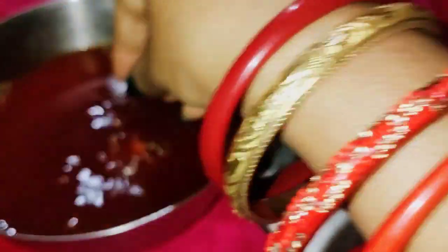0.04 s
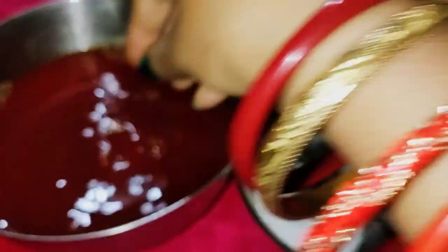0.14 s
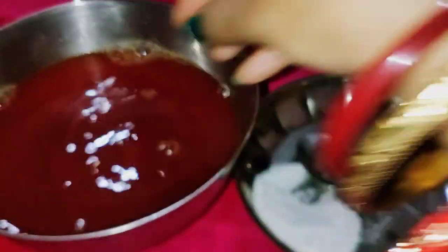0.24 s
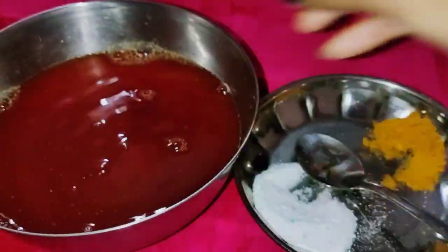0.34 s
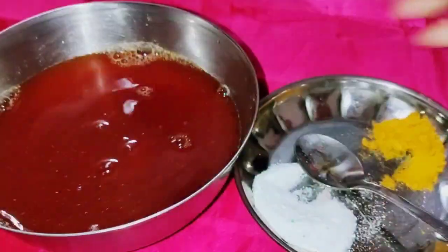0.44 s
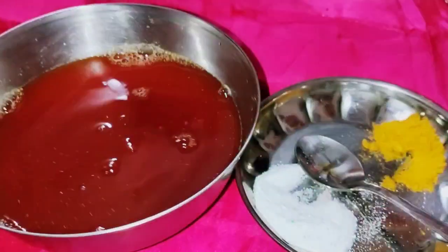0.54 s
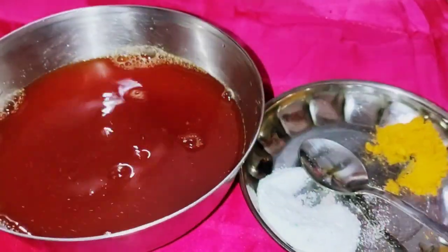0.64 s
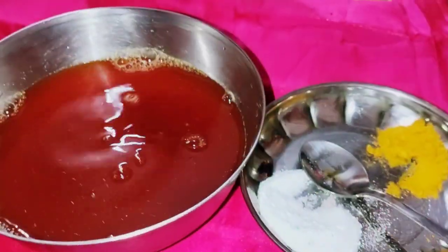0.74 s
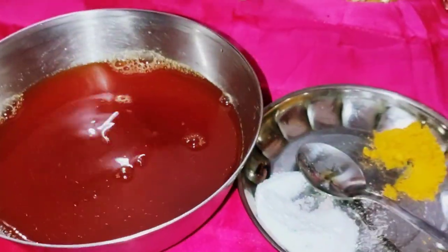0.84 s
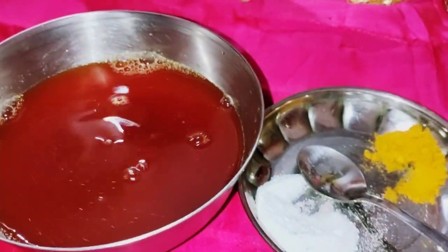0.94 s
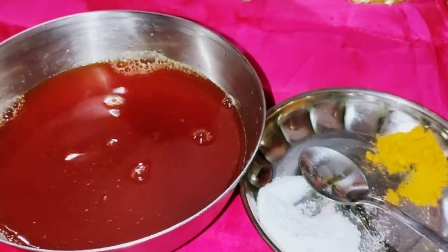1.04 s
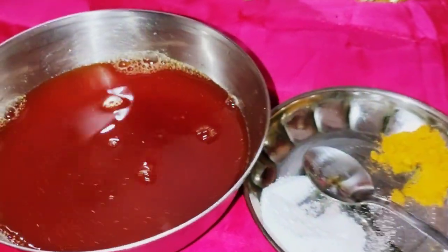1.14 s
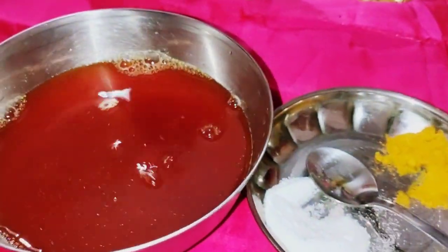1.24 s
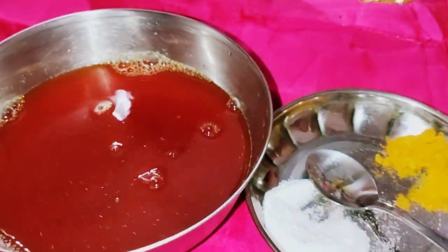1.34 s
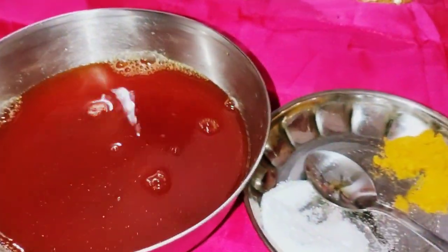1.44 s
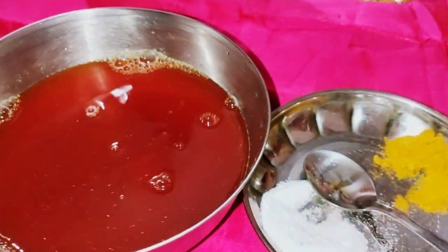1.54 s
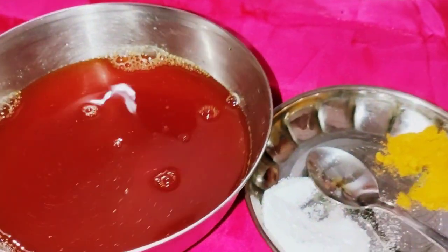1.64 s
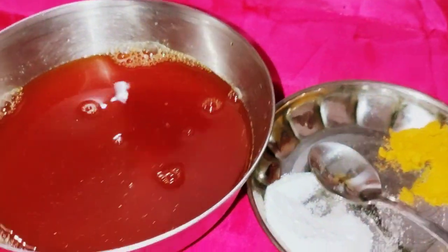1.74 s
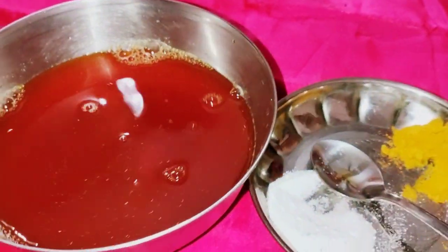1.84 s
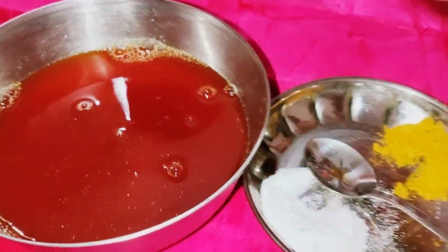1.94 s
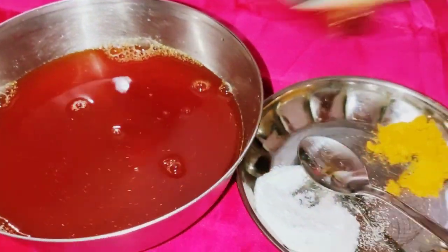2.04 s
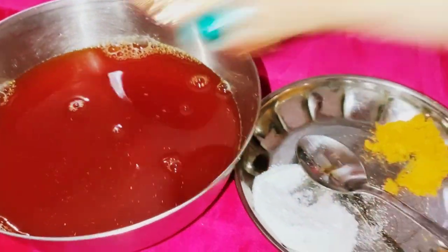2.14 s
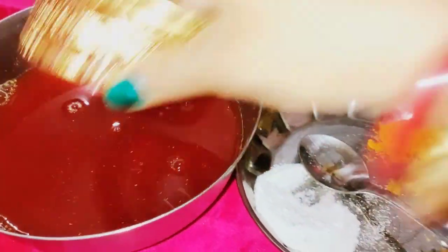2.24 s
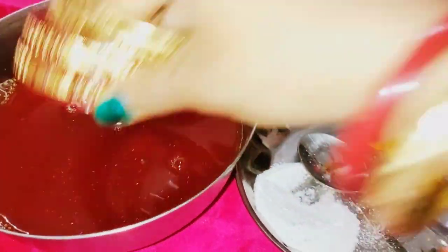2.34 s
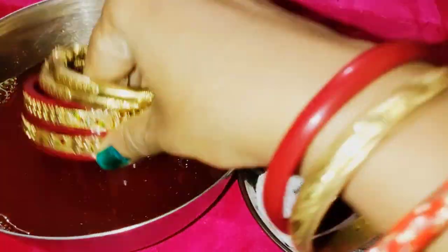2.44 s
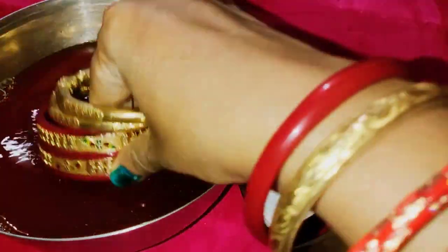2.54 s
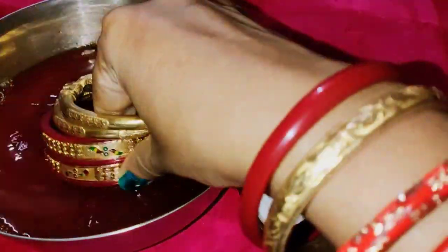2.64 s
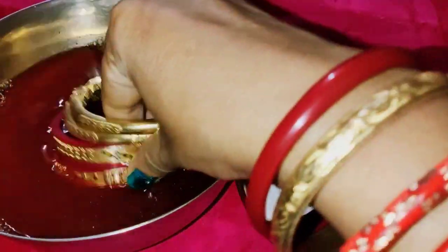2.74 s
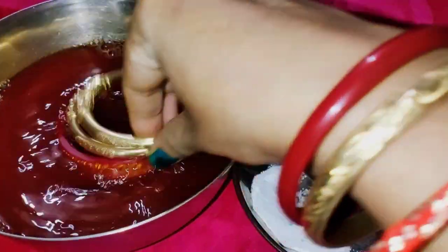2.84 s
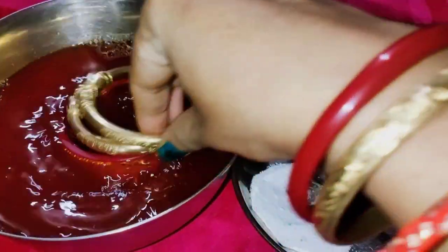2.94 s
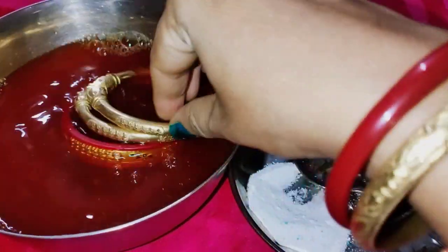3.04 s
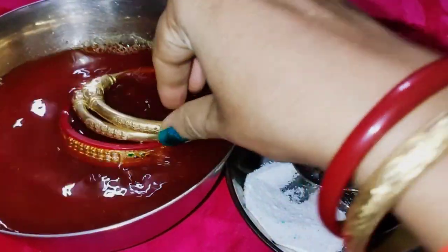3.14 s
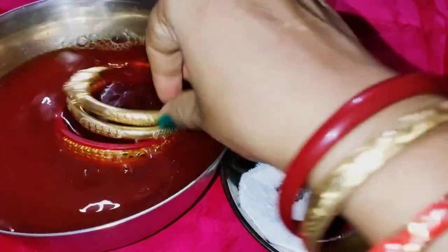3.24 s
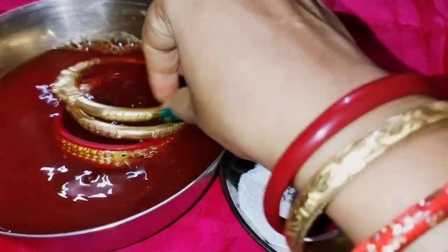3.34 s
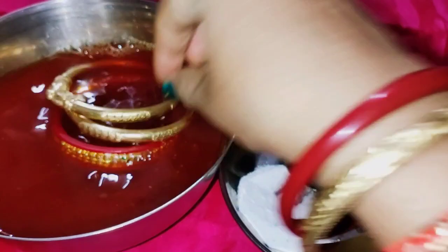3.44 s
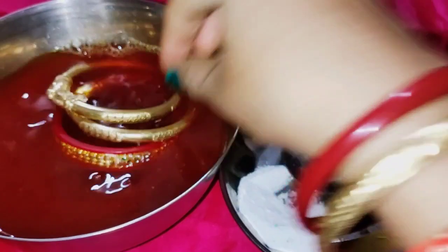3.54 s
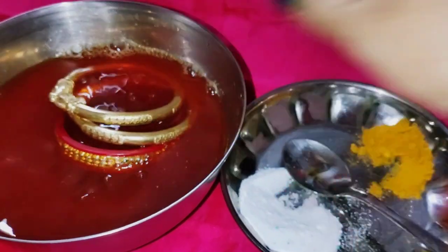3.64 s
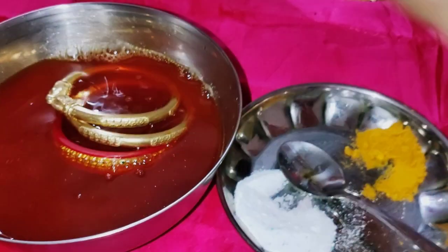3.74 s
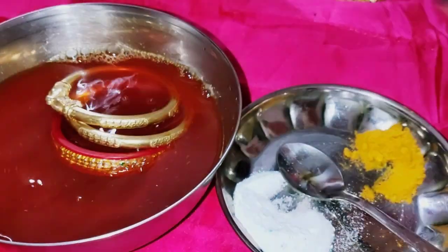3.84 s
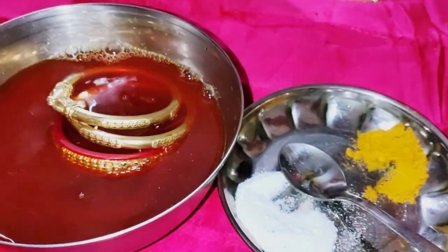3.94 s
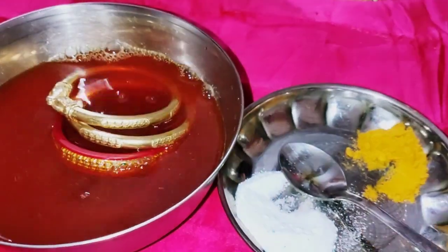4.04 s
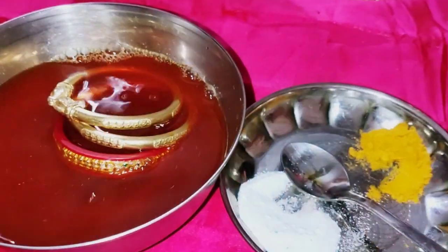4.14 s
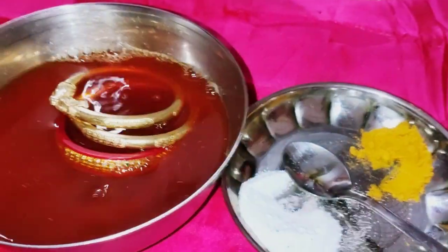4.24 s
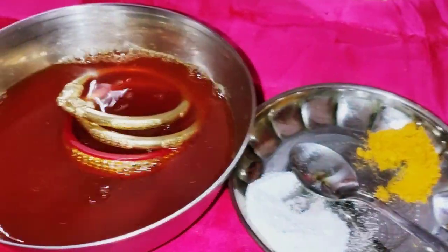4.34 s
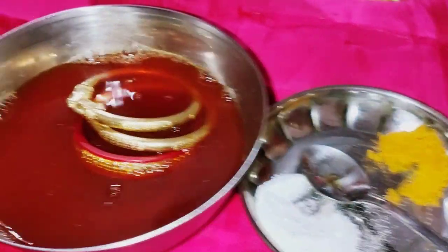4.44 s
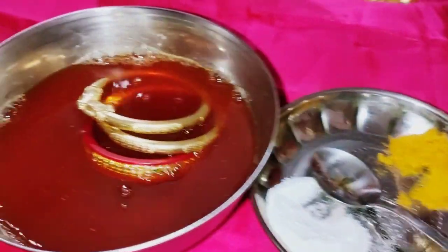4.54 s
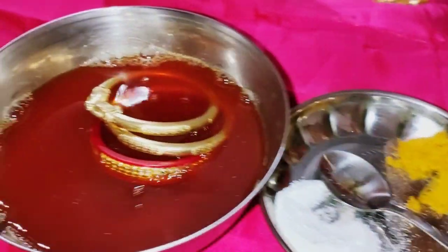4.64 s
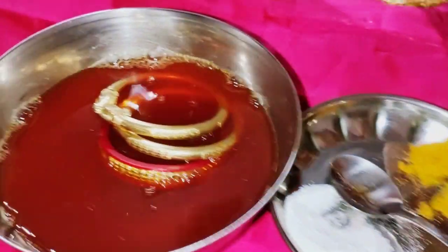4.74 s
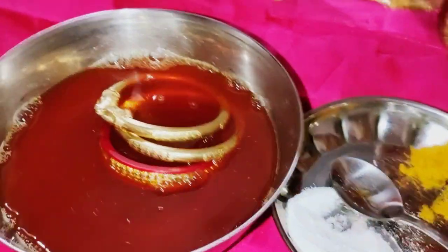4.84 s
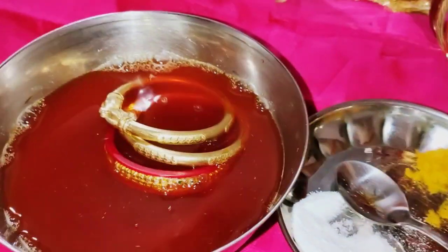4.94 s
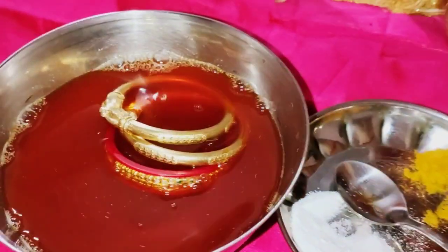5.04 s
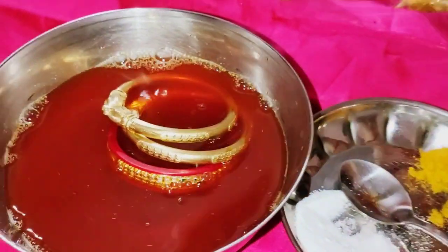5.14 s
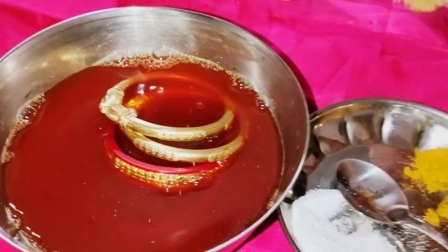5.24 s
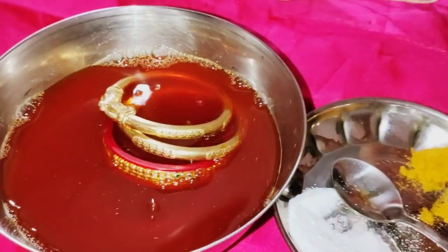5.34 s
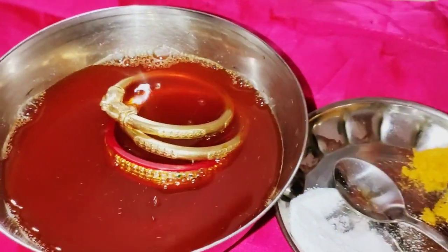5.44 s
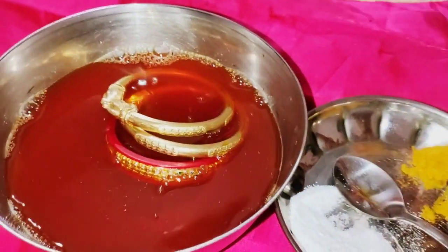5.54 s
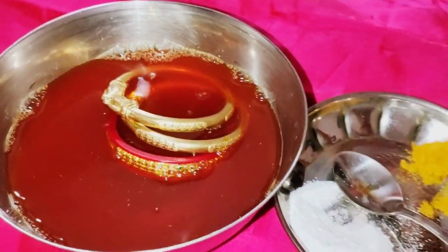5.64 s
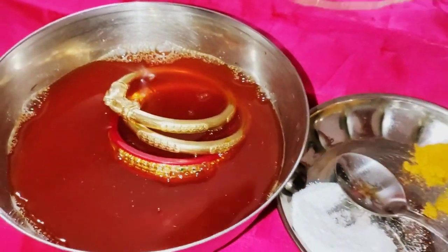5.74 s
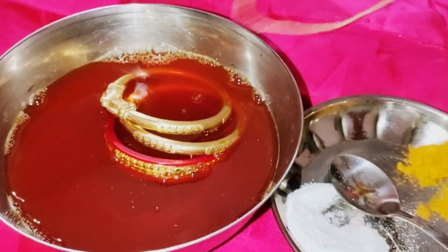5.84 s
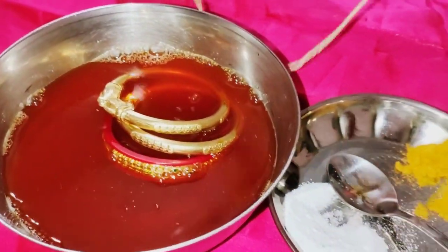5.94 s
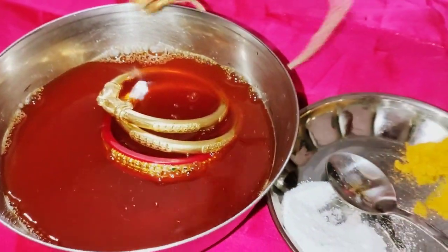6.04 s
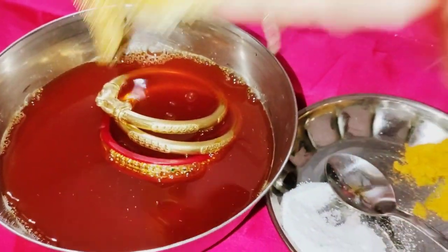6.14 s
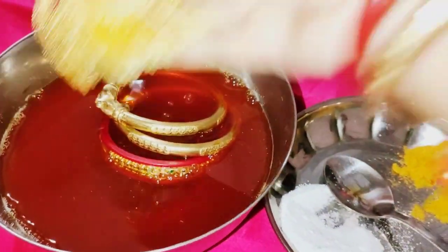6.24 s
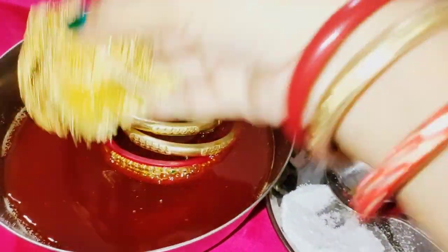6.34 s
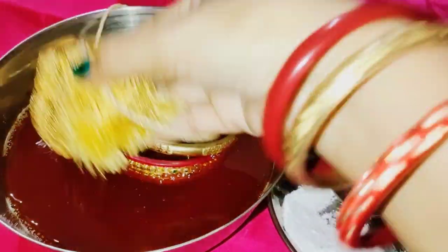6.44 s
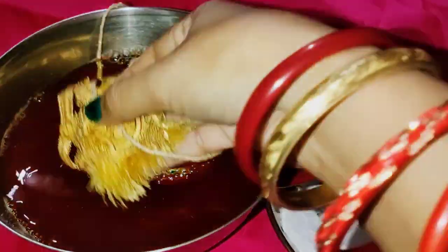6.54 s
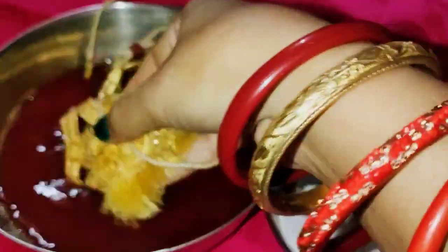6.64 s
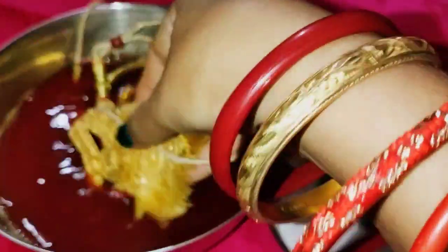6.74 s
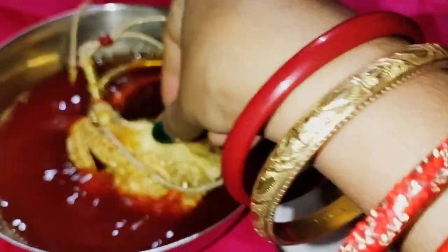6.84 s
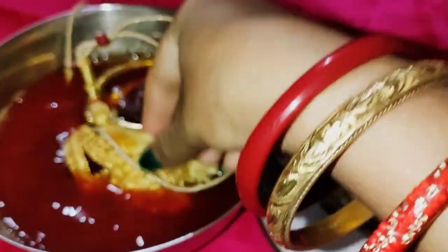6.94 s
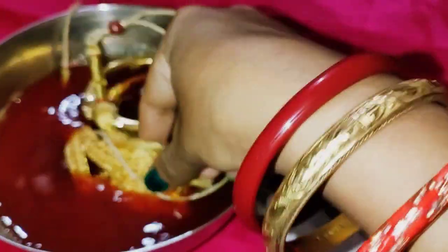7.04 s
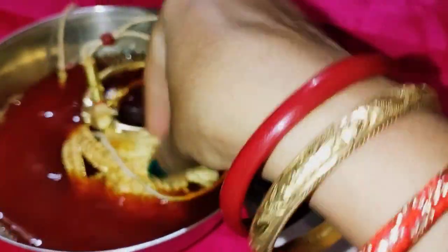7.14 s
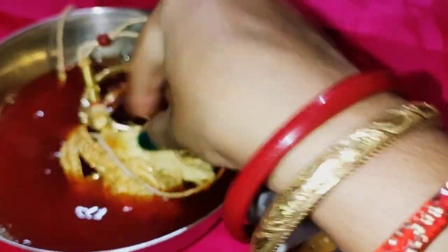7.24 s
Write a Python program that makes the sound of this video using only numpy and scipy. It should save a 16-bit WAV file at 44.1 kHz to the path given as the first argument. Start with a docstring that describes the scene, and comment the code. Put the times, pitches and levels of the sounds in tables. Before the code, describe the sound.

Gold bangles and a necklace clink, chatter and ring against a steel bowl of water in three bursts, over a faint rattling fan.

```python
"""Gold jewellery in a bowl of water

Gold bangles and a necklace are lowered into a steel bowl of water, close to a phone. They clink (cracks, gold modes,
damped bowl knocks), slide and chatter (dense ticks); one bangle bounces on the bowl and sings between contacts
(a tone restarted at each landing), and the glass bangles on the wrist ping (a few decaying modes).
Far off a loose ceiling fan rattles in rhythm (noise bursts) over the kitchen's hum (shaped noise); once something thumps."""
import sys
import numpy as np
from scipy import signal
from scipy.fft import rfft, irfft, next_fast_len
from scipy.io import wavfile
from scipy.ndimage import uniform_filter1d

SR = 44100
rng = np.random.default_rng(int(sys.argv[2]) if len(sys.argv) > 2 else 0)


def generate_wav(sig):
    """Save sig (samples, or channels by samples) to the path in sys.argv[1] as 16-bit PCM at SR."""
    pcm = np.round(np.clip(np.atleast_2d(sig).T, -1, 1) * 32767).astype(np.int16)
    wavfile.write(sys.argv[1], SR, pcm)


N = 321930
TIME = np.arange(N) / SR

# Modes of the gold stack: pitch_hz, level_db
GOLD_MODES = [(2550, -7.5), (5180, -2), (5870, 4.5), (6230, 2), (6580, 4), (7440, 6), (7990, -7.5),
              (8240, 0), (8900, -25.5), (9800, -17.5), (10200, 0.5), (10500, -4), (10890, -6),
              (12000, -6.5), (12880, -24), (14400, -18), (15250, 1)]
# Treble colour of metal contacts: pitch_hz, gain_db
CONTACT_TREBLE = [(2240, -62.5), (3800, -22.5), (4950, 1.5), (6690, -13), (8290, -4.5), (9040, -2.5),
                  (10000, -3), (11300, -4), (15500, -9.5), (16000, -25), (16500, -52.5)]


def amp(db):
    """Decibels to gain."""
    return 10 ** (np.asarray(db) / 20)


def unit(x):
    """Scale to rms 1."""
    return x / np.sqrt(np.mean(x ** 2) + 1e-20)


def peaked(x, db):
    """Scale so that the peak is at db."""
    return amp(db) * x / np.abs(x).max()


def along(points, hz):
    """Interpolate (Hz, value) points on a log frequency axis."""
    point_hz, values = np.transpose(points)
    return np.interp(np.log(hz + 1), np.log(point_hz + 1), values)


def filtered(x, response):
    """Multiply the spectrum of x by a complex response of frequency."""
    size = next_fast_len(len(x) + 4096)
    spectrum = rfft(x, size) * response(np.fft.rfftfreq(size, 1 / SR))
    return irfft(spectrum, size)[:len(x)]


def coloured(x, spectrum):
    """Shape x by (Hz, dB) points."""
    return filtered(x, lambda hz: amp(along(spectrum, hz)))


def resonant(x, modes):
    """Pass x through parallel (Hz, width Hz, dB) resonances of alternating sign."""
    def response(hz):
        total = 0
        for k, (centre, width, db) in enumerate(modes):
            damping = 1j * hz * width
            total = total + (-1) ** k * amp(db) * damping / (centre * centre - hz * hz + damping)
        return total
    return filtered(x, response)


def patchy(x, depth_db):
    """Give x a random gain that differs from band to band and moment to moment."""
    bins = signal.stft(x, nperseg=512)[2]
    field = uniform_filter1d(rng.standard_normal(bins.shape), size=3, axis=0)
    field = uniform_filter1d(field, size=12, axis=1)
    return signal.istft(bins * amp(depth_db * unit(field)), nperseg=512)[1][:len(x)]


def add(track, s, sound):
    """Mix a sound into the track at s seconds."""
    part = track[round(s * SR):][:len(sound)]
    part += sound[:len(part)]


def clinks():
    """Each contact cracks, rings the gold modes near its pitch, knocks the bowl and thuds through the water."""
    # Contacts: start_s, crack_peak_db (before the treble colour), knock_db (re crack), knock_hz,
    # ring_pitch_hz (rings most), ring_db (re crack)
    contacts = [(0.0383, -39.5, -30.5, 2080, 9000, -22.5), (0.0456, -27.5, -22.5, 1175, 9300, -21),
                (0.0524, -20, -19, 1680, 9200, -22), (0.0631, -24.5, -11.5, 1960, 10270, 5),
                (0.0717, -17, -16.5, 1676, 8430, -5), (0.0831, -14, -8, 2115, 11710, -7),
                (0.095, -20.5, -9.5, 1510, 8820, -14), (0.1211, -32.5, 6.5, 1345, 10270, -13.5),
                (0.1376, -35.5, -6, 1390, 10260, -18.5), (0.1684, -35.5, 0.5, 1700, 8760, -31),
                (0.182, -36.5, -20, 1880, 10000, -15), (0.2166, -38.5, -19.5, 2746, 10300, -23.5),
                (0.2778, -33, -8.5, 1302, 9370, 4.5), (0.308, -39, -27, 1505, 9650, -12.5),
                (0.354, -41.5, -14.5, 1300, 10300, -12), (0.3815, -32.5, -16.5, 1342, 9300, -4),
                (0.391, -35.5, -18, 1775, 10440, -21), (0.4105, -35.5, -9.5, 1597, 5052, -23.5),
                (2.171, -37.5, -4.5, 2160, 10460, -6.5), (2.5912, -33, -6.5, 2553, 9100, -5),
                (2.7561, -34.5, -4, 2400, 6120, -3.5), (2.7847, -28.5, -12.5, 2450, 10600, -6.5),
                (2.8485, -15.5, -23.5, 2603, 11000, -13), (2.8745, -15.5, -24, 1350, 9445, -28),
                (2.8974, -4, -11, 1949, 10820, -9), (2.9, 4.5, -22.5, 1783, 10740, -21.5),
                (2.943, -24.5, -12.5, 2430, 10400, -21), (3.0122, -18, -8, 1971, 8910, -15),
                (3.022, -7.5, 0, 1840, 9300, -6), (3.0353, -8.5, -13.5, 2040, 9730, -10),
                (3.0449, -5, -6, 1960, 9200, -19), (3.2345, -19, -7.5, 1960, 9600, -10),
                (3.2452, -14, -4, 1796, 9720, -15.5), (3.2551, -9.5, -8.5, 1990, 8980, -10.5),
                (3.2588, -7.5, -7, 2058, 9500, 2), (3.2969, -17.5, -3.5, 2240, 9240, -16),
                (3.3123, -18, -2, 2050, 5040, -11), (3.3423, -19, -8, 1806, 9600, -13.5),
                (3.3658, -13, -12.5, 1860, 9000, -11.5), (3.3841, -24, -28, 2020, 9800, -8),
                (6.4862, -44.5, -11.5, 2690, 10040, 0), (6.4974, -38.5, 3, 2374, 6408, -9.5),
                (6.5083, -36, -3.5, 2207, 6400, -5), (6.5194, -32.5, -8.5, 2104, 7440, -31),
                (6.558, -34, -22, 1550, 6450, -8), (6.5706, -15.5, -13, 2479, 9070, -8.5),
                (6.5758, -6.5, -15.5, 1782, 9560, 0.5), (6.5813, -18.5, -5.5, 1880, 9990, -15.5),
                (6.6338, -20, -1.5, 1780, 9020, -11), (6.668, -31, -12, 2000, 6870, -20),
                (6.7184, -38, -9.5, 2020, 7000, -12), (6.7495, -25, -3, 1730, 8500, -10),
                (6.7799, -20, -20.5, 2517, 7600, -26), (6.7898, -24.5, -8, 2487, 8300, -19),
                (6.866, -29.5, -22.5, 2546, 7740, -26), (6.8761, -26.5, -14.5, 2176, 8025, -5),
                (6.961, -32.5, -27, 2140, 9600, -24), (6.992, -38, -1.5, 1393, 9500, -10),
                (7.013, -34.5, -1, 2020, 9700, -9.5), (7.022, -35.5, -1.5, 1992, 11400, -9.5),
                (7.0872, -15.5, -5.5, 1790, 7820, -22.5), (7.1501, -35.5, -3, 2020, 6015, -16)]
    # The water-damped bowl: multiple of the knock pitch, width_hz, level_db
    bowl_modes = [(1, 342.5, 14), (1.45, 907, 3)]
    # While the gold hangs clear of the water it rings on: from_s, to_s, t60_s
    in_air = [(2.7, 2.95, 0.083), (6.7, 6.9, 0.043)]
    ring_t60_s, shortens_db = 0.013, 0.5355  # t60 at a ring of 0 dB; dB of t60 lost per dB of ring
    thud_db, thud_follows = -13, 0.73  # thud under a knock of 0 dB; its share of the knock's dB changes

    out, cracks, t = np.zeros(N), np.zeros(N), TIME[:SR // 6]
    rise = 1 - np.exp(-t / 0.000067)
    hz, level_db = np.transpose(GOLD_MODES)
    for s, db, knock_db, knock_hz, pitch_hz, ring_db in contacts:
        # The place of the blow favours some modes
        near_db = -45 * np.minimum(np.abs(np.log2(hz / pitch_hz)), .4)
        gains = amp(level_db + near_db + 1.2 * rng.standard_normal(len(hz)))
        # Contact with neighbours shifts the modes
        detune = 1 + .004 * rng.standard_normal(len(hz))
        cycles = np.outer(hz * detune, t) + rng.random((len(hz), 1))
        ring = gains @ np.sin(2 * np.pi * cycles)

        crack_noise, knock_noise, thud_noise = rng.standard_normal((3, len(t)))
        crack = amp(-60 * t / 0.022) * rise * crack_noise
        crack = resonant(crack, [(pitch_hz, 1800, 0), (13000, 16000, -15)])
        bowl = [(multiple * knock_hz, width_hz, part_db) for multiple, width_hz, part_db in bowl_modes]
        knock = resonant(amp(-60 * t / 0.011) * knock_noise, bowl)
        thud = resonant(amp(-60 * t / 0.0031) * thud_noise, [(500, 774, 0)])

        # The stronger the ring beside its crack, the shorter it lasts, unless it hangs in air
        t60 = ring_t60_s * amp(-shortens_db * ring_db)
        t60 = next((free for start, end, free in in_air if start < s < end), t60)
        add(out, s, amp(db + ring_db - 60 * t / t60) * rise * ring)
        add(out, s, peaked(knock, db + knock_db))
        add(out, s, peaked(thud, thud_follows * (db + knock_db) + thud_db))
        add(cracks, s, peaked(crack, db))
    return out + coloured(cracks, CONTACT_TREBLE)


def bouncing_bangle():
    """The bangle sings on in the air; each landing restarts the ring from its peak, with a new size and pitch."""
    # Landings, each setting a new ring: start_s, ring_db (before the band filter), pitch_hz
    landings = [(3.012, -25.5, 2040), (3.0225, -7.5, 2015), (3.0447, -8, 1997), (3.0602, -25.5, 1774),
                (3.067, -18, 2020), (3.075, -26.5, 2007), (3.083, -19.5, 1890), (3.091, -31, 1950),
                (3.099, -22, 1956), (3.109, -35.5, 1930), (3.113, -20, 1950)]
    # Then it rattles to rest: first contact, gap between contacts, first ring, loss a contact
    settle_s, gap_s, settle_db, loss_db = 3.123, .008, -26.5, 1.05
    settle_hz, spread_hz, spread_db = 2007, 21, 3.5

    k = np.arange(12)
    time_chance, level_chance, pitch_chance = rng.standard_normal((12, 3)).T
    contact_s = settle_s + gap_s * (k + 0.14 * time_chance.clip(-2, 2))
    contact_db = settle_db - loss_db * k + spread_db * level_chance
    contact_db[-1] = -120  # at rest
    contact_hz = settle_hz + spread_hz * pitch_chance
    settle = np.transpose([contact_s, contact_db, contact_hz])
    s, db, hz = np.vstack([landings, settle]).T

    hop = np.clip(np.searchsorted(s, TIME) - 1, 0, None)  # latest landing at each moment
    flown = TIME - s[hop]
    size = (flown >= 0) * amp(db[hop] - 60 * flown.clip(0) / .45)
    ring = size * np.cos(2 * np.pi * hz[hop] * flown)  # the sudden restart is the click of the landing
    return filtered(ring, lambda f: 1 / (1 + (f / 3300) ** 6) / (1 + (900 / (f + 1)) ** 4))


def sliding_links():
    """Dense tiny contacts of uneven size feed the gold's treble and the bowl's low ring."""
    # Spans of sliding, each a list of points: time_s, treble_db, low_ring_db
    spans = [
        [(0.0, -61, -60), (0.035, -57, -59), (0.08, -33, -43), (0.13, -48.5, -54.5), (0.21, -56, -54.5),
         (0.274, -62, -57), (0.42, -59, -60.5), (0.538, -75, -62.5), (0.6, -101, -61)],
        [(2.55, -69.5, -69.5), (2.72, -67.5, -67), (2.808, -63.5, -45.5), (2.934, -42.5, -52),
         (3.142, -44.5, -51), (3.22, -59, -56), (3.24, -43, -35), (3.352, -32.5, -44.5), (3.404, -58.5, -55),
         (3.55, -76, -68)],
        [(6.45, -72, -86.5), (6.536, -55.5, -49), (6.66, -59, -65), (6.72, -56.5, -60.5), (7.022, -64.5, -56.5),
         (7.182, -62.5, -69.5), (7.3, -91.5, -58)],
    ]
    s, treble_db, low_db = np.transpose([row for span in spans for row in span])
    heard = sum((TIME >= span[0][0]) & (TIME <= span[-1][0]) for span in spans)
    heard = uniform_filter1d(heard * 1., size=2000)  # soft edges

    tick_sizes = amp(np.minimum(3.5 * rng.exponential(size=N), 9))
    ticks = (rng.random(N) < 600 / SR) * tick_sizes  # about 600 a second
    chatter = .8 + np.convolve(ticks, amp(-60 * TIME[:900] / .02))[:N]
    rub = patchy(chatter * rng.standard_normal(N), depth_db=1.5)
    jingle = resonant(rub, [(hz, 130, db) for hz, db in GOLD_MODES])
    treble = unit(coloured(.6 * unit(jingle) + unit(rub), CONTACT_TREBLE))
    low = unit(resonant(chatter * rng.standard_normal(N), [(1800, 210, 1.5), (2820, 2900, -7.5)]))

    treble_gain = amp(np.interp(TIME, s, treble_db))
    low_gain = amp(np.interp(TIME, s, low_db))
    return heard * (treble_gain * treble + low_gain * low)


def wrist_bangles():
    """Glass bangles touch lightly, a little way off, and ring briefly with a few clear modes."""
    # Touches of the wrist bangles: start_s, level_db
    touches = [(1.997, -52), (2.172, -46), (5.3863, -41), (5.6446, -34), (5.6604, -42), (5.8533, -47),
               (5.8654, -47), (6.2406, -36.5)]
    # Modes of the glass: pitch_hz, level_db, t60_s (of the main decay)
    glass_modes = [(3600, -20, .06), (6500, -16, .04), (7730, -10, .09), (10530, 0, .09),
                   (12270, -10, .045), (14550, -23, .1), (14700, -24, .1)]
    out, t = np.zeros(N), TIME[:SR // 2]
    for s, db in touches:
        ring = 0
        for hz, level_db, t60 in glass_modes:
            gain = amp(level_db + 0.28 * rng.standard_normal())
            decay = amp(-60 * t / t60) + .12 * amp(-60 * t / (5.0 * t60))  # with a faint longer tail
            wander = np.cumsum(0.042 * rng.standard_normal(len(t)))  # random phase wander blurs the tone
            ring = ring + gain * decay * np.sin(2 * np.pi * hz * t + wander)
        tick = amp(-4.5 - 60 * t / .01) * rng.standard_normal(len(t))
        add(out, s, amp(db) * (1 - np.exp(-t / 0.00092)) * (ring + tick))
    return out + amp(-8) * room(out)


def room(x):
    """Noise tail as the room's answer: each frequency dies at its own speed."""
    # Decay of the room: pitch_hz, t60_s
    room_decay = [(1000, 0.23), (2500, .2), (6000, 0.21), (15000, 0.083)]
    hz, t, bins = signal.stft(rng.standard_normal(SR // 2), SR, nperseg=256)
    decay = amp(-60 * t / along(room_decay, hz)[:, None])
    tail = signal.istft(bins * decay, SR, nperseg=256)[1]
    return signal.fftconvolve(x, tail / np.linalg.norm(tail))[:N]


def fan():
    """The fan rocks on its rod once a turn: rattles blurred by distance sound its housing unevenly."""
    # Rattles within a turn: offset_s, level_db (before random spread)
    turn_rattles = [(0, -51), (.065, -53.5), (.178, -55), (.231, -51.5)]
    # Resonances of the fan's housing: pitch_hz, width_hz, level_db
    housing_modes = [(1660, 100, -5), (2100, 120, -9), (2500, 140, -1), (2857, 100, -7.5), (3147, 86, -7.5),
                     (3605, 51, -8.5), (3800, 64, -15.5), (4334, 96, -10.5), (4664, 64, -5.5),
                     (5164, 240, -10.5), (5680, 200, -10), (6600, 89, -13), (7410, 27, -16.5)]
    # Treble colour of the rattles: pitch_hz, gain_db
    rattle_treble = [(7000, -57), (8000, -9.5), (12000, -7), (15000, -6.5), (16000, -36.5)]
    first_s, turn_s = .2003, .37355
    spread_db, treble_db, treble_spread_db = 2, -19, 4  # treble is relative to the body

    body, treble, t = np.zeros(N), np.zeros(N), TIME[:SR // 4]
    shape = amp(-60 * (t / .2) ** 2 - 60 * t / .8) * (1 - np.exp(-t / .008))  # a short burst of shakes
    for start in np.arange(first_s, N / SR, turn_s):
        for offset, db in turn_rattles:
            harder, brighter = rng.standard_normal(2)
            db = db + spread_db * harder
            add(body, start + offset, amp(db) * shape)
            add(treble, start + offset, amp(db + treble_db + treble_spread_db * brighter) * shape)
    low = unit(patchy(resonant(rng.standard_normal(N), housing_modes), depth_db=2.5))
    high = unit(patchy(coloured(rng.standard_normal(N), rattle_treble), depth_db=5))
    return body * low + treble * high


def thump():
    """A dull blow, a swell of low-passed noise through two resonances, and the low ring that it leaves."""
    # Resonances of the blow: pitch_hz, width_hz, level_db
    blow_modes = [(426.3, 260, -8), (890, 320, -8.5)]
    blow_s, blow_db = 4.955, -20  # centre of the swell; its drive before the filters
    boom_db, boom_hz, boom_t60_s = -41.5, 111.4, 0.47

    push = amp(blow_db) * np.exp(-((TIME - blow_s) / 0.019) ** 2) * rng.standard_normal(N)
    blow = resonant(filtered(push, lambda hz: 1 / (1 + (hz / 1300) ** 4)), blow_modes)
    after = (TIME - blow_s + .06).clip(0)  # the ring starts with the first of the swell
    boom = amp(boom_db - 60 * after / boom_t60_s) * (1 - np.exp(-after / .05))
    return blow + boom * np.sin(2 * np.pi * boom_hz * after)


def kitchen_hum():
    """Shaped noise of the kitchen, swelling around 3.2 s as the water and gold are handled."""
    # Colour of the hum: pitch_hz, gain_db
    hum_colour = [(24, -45.5), (40, -19), (156, -6), (308, -6), (510, -14.5), (707, -12), (1430, -12.5),
                  (1620, -11.5), (1890, -25), (2560, -7.5), (3460, -39), (5310, -23.5), (7560, -36.5),
                  (14900, -45.5), (16500, -58.5)]
    # Level of the hum: time_s, rms_db (before the phone)
    hum_level = [(0.0, -51), (1.08, -54.5), (2.6, -54.5), (3.23, -46.5), (3.522, -52), (6.0, -54),
                 (7.3, -52)]
    s, db = np.transpose(hum_level)
    hum = unit(coloured(patchy(rng.standard_normal(N), depth_db=.4), hum_colour))
    return amp(np.interp(TIME, s, db)) * hum


def suppressed(x, depth_db):
    """The phone's noise suppressor turns down each treble band while it stays near its usual level."""
    hz, _, bins = signal.stft(x, SR, nperseg=512, noverlap=384)
    power = signal.lfilter([.12], [1, -.88], np.abs(bins) ** 2, axis=1)  # smoothed in time
    usual = np.percentile(power, 40, axis=1, keepdims=True)
    strength = 1 / (1 + (1200 / (hz[:, None] + 1)) ** 4)  # spares the bass
    gain = np.maximum(1 - strength * usual / (power + 1e-20), amp(depth_db))
    return signal.istft(bins * gain, SR, nperseg=512, noverlap=384)[1][:N]


def scene():
    """Near jewellery with its room, the wrist, the far fan, the thump and the hum."""
    near, bounce = clinks(), bouncing_bangle()
    echoes = amp(-7.5) * room(near + amp(-17) * bounce)
    jewellery = near + bounce + echoes + wrist_bangles() + sliding_links()
    return (jewellery + fan() + thump() + kitchen_hum())[None]


def record(dry):
    """A dip in the microphone, noise suppression, rounded peaks; nothing passes above the band limit."""
    top_hz = 16600
    heard = dry[0] - 0.27 * resonant(dry[0], [(4000, 230, 0)])
    clean = suppressed(heard, depth_db=-15)
    soft = clean / (1 + np.abs(clean / .99) ** 6) ** (1 / 6)
    return filtered(soft, lambda hz: hz < top_hz)[None]


dry = scene()
out = record(dry)
generate_wav(out)
```